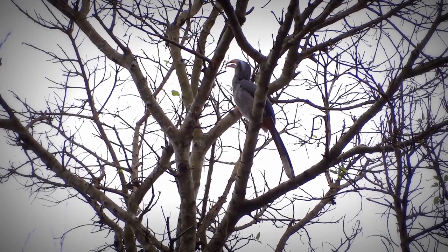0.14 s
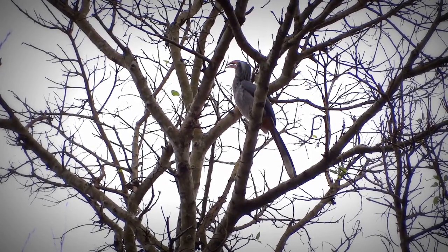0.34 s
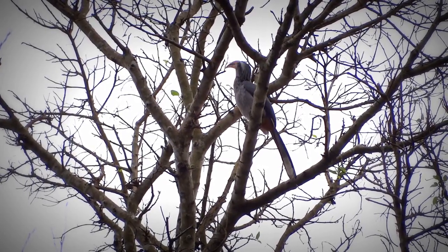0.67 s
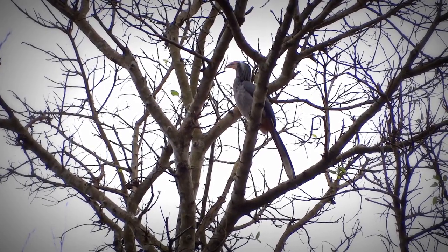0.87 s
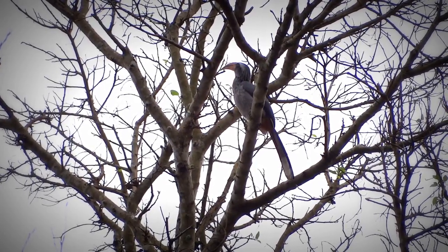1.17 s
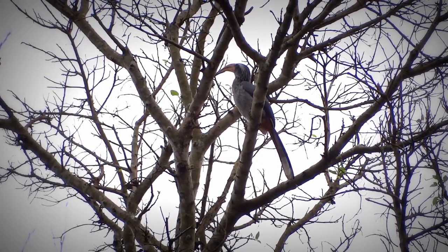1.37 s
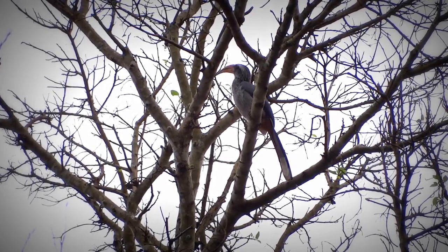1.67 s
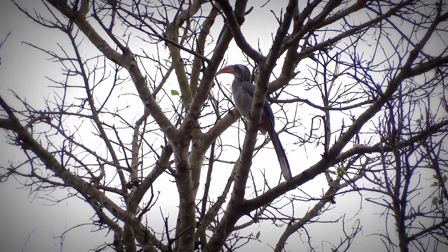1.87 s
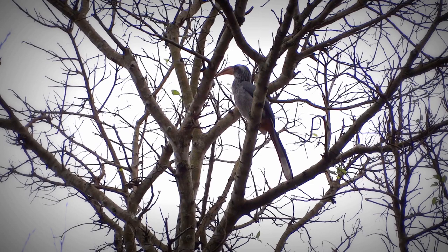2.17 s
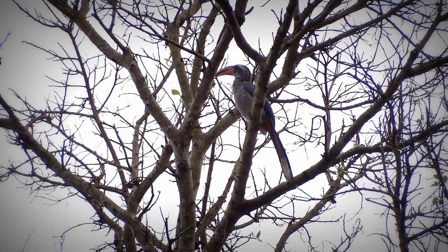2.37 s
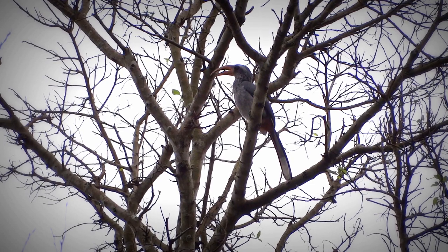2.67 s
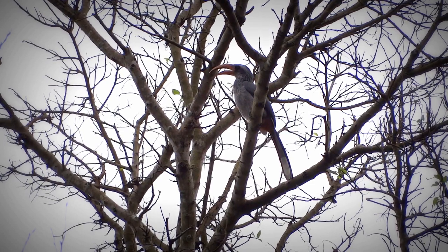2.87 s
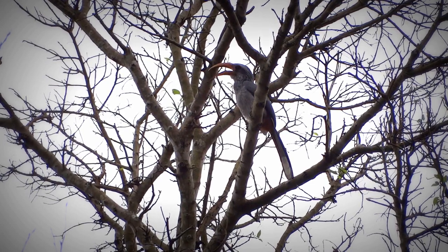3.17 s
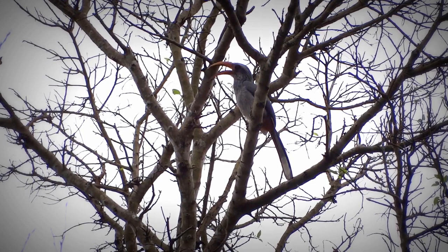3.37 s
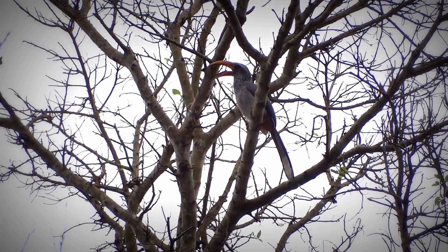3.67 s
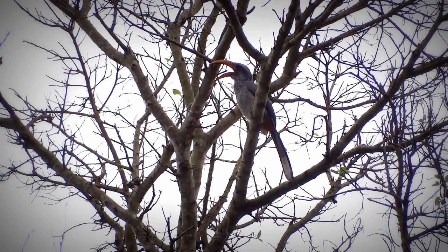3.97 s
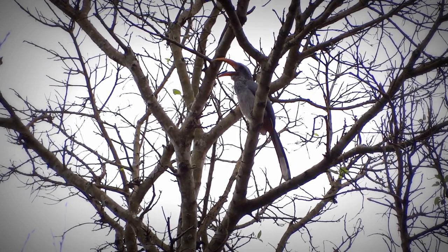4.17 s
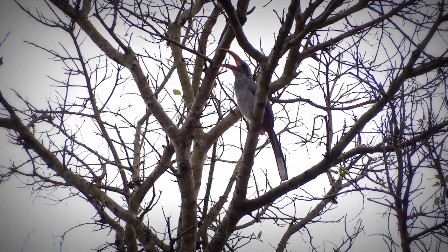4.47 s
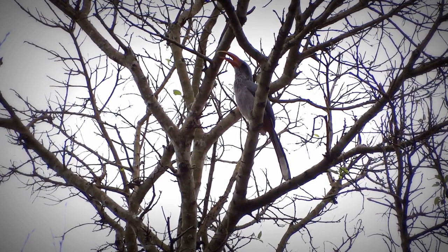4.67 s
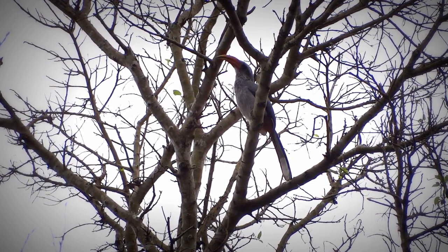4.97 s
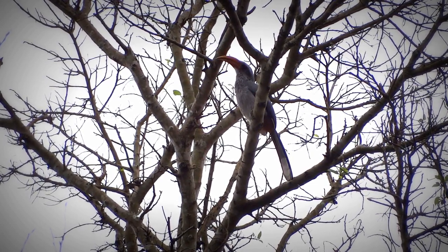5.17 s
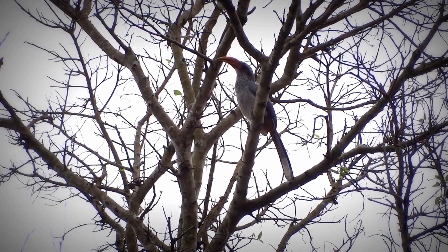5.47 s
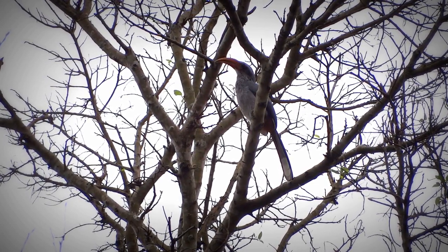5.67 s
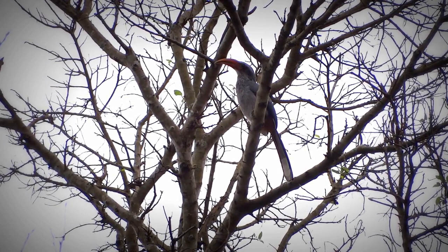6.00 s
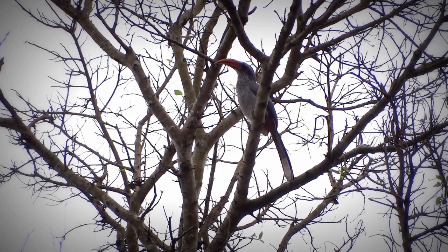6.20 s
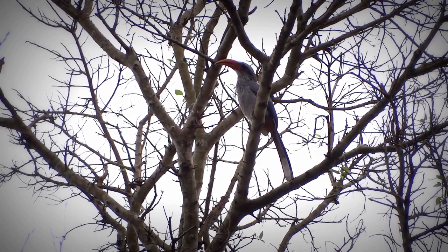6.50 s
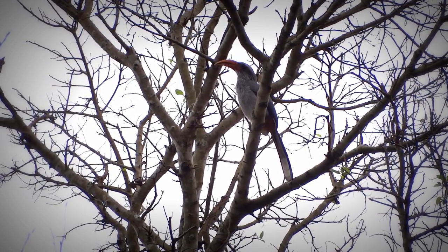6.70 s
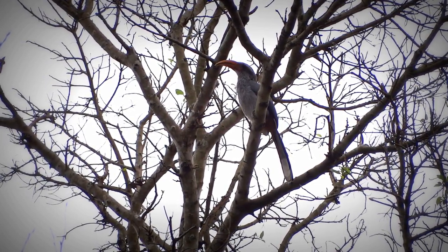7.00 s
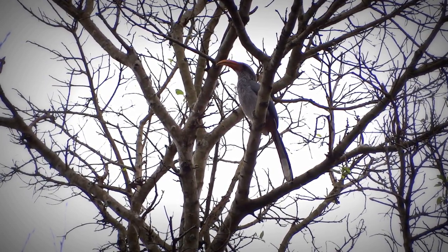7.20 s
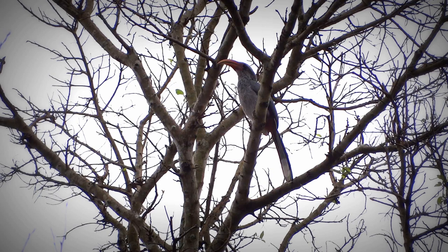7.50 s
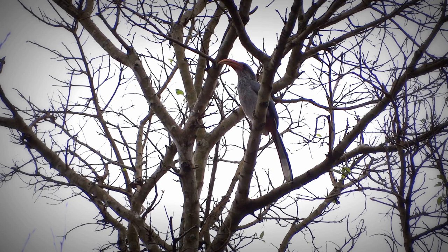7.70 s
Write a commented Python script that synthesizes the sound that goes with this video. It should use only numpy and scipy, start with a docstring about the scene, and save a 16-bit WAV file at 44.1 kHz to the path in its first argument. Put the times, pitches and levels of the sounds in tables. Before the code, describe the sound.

Outdoors in woodland, a large hornbill gives a hoarse, rising and falling squeal right at the start, with a sharp dry click, then a rounder squeal just after three seconds. Between and after, smaller birds warble, buzz and pip farther away, and faint low hoots roll behind. Insects shimmer high and steady over soft hiss and light wind rumble. Nearly mono camera microphone, with echo from the trees.

```python
"""Hornbill squeals in the woods

A hornbill squeals twice from a bare tree: reedy, arching harmonic tones, frayed into rasp, with woodland echo.
Smaller birds further off warble, buzz and pip as gliding sine tones; low hoots share one wavering pitch.
Short ringing bursts make a few dry clicks and grainy noise a scuff, over insects made of narrow noise bands.
Soft hiss and a light wind rumble, both shaped noise, lie under it all on a nearly mono camera microphone."""
import sys
import numpy as np
from scipy import signal
from scipy.fft import rfft, irfft
from scipy.io import wavfile

SR = 44100
rng = np.random.default_rng(int(sys.argv[2]) if len(sys.argv) > 2 else 0)


def unload_audio(sound):
    """Save the sound as a 16-bit wav file, at the path given as the first command line argument."""
    columns = np.transpose(np.atleast_2d(sound))
    # keep every value between -1 and 1, then stretch to whole-number steps
    steps = np.round(np.clip(columns, -1, 1) * 32767)
    wavfile.write(sys.argv[1], SR, steps.astype(np.int16))


N = 346185
T = np.arange(N) / SR  # time (s)
FREQ = np.fft.rfftfreq(N, 1 / SR)  # spectrum bins (Hz)


def undb(db):
    """Decibels to gain."""
    return 10 ** (np.asarray(db) / 20)


def unit(x):
    """Scale to rms 1."""
    return x / np.sqrt(np.mean(x ** 2) + 1e-20)


def colour(x, points):
    """Filter by a spectrum of (f/Hz, level/dB) points, joined on a log frequency axis."""
    hz, db = np.transpose(points)
    gain = undb(np.interp(np.log(FREQ + 1), np.log(hz), db))
    return irfft(rfft(x) * gain, N)


def noise():
    """White noise."""
    return rng.standard_normal(N)


def walk(rate):
    """Smooth random wavering of rms 1, from noise rolled off above about rate Hz."""
    return unit(irfft(rfft(noise()) * np.exp(-.5 * (FREQ / rate) ** 2), N))


def curve(rows, axis=1):
    """One column of a table, joined by straight lines in time."""
    rows = np.array(rows)
    return np.interp(T, rows[:, 0], rows[:, axis])


def gate(rows, fade=0.0033):
    """Open while a table lasts, with soft ends of fade seconds."""
    to_nearest_end = np.minimum(T - rows[0][0], rows[-1][0] - T)
    return np.clip(to_nearest_end / fade + .5, 0, 1)


def hump(s, length):
    """A smooth swell that peaks at s seconds and is down to 1/e half a length either side."""
    return np.exp(-(2 * (T - s) / length) ** 2)


def sine(hz):
    """A sine that follows a moving pitch."""
    return np.sin(2 * np.pi * np.cumsum(hz) / SR)


def pan(x, db):
    """Place a sound by its left minus right level."""
    return np.array([x * undb(db / 2), x * undb(-db / 2)])


def spread(mid, side):
    """Left and right from mid and side."""
    return np.array([mid + side, mid - side])


def add(out, s, x):
    """Mix a short sound in at s seconds."""
    i = int(s * SR)
    out[..., i:i + x.shape[-1]] += x[..., :N - i]


def woods(x, direct_db, wet_db, t60, near_db, near_t60=0.031, side=0.25):
    """Direct sound, quick scatter from near branches and a long tail from far trunks."""
    t = np.arange(int(1.5 * SR)) / SR
    trunks = unit(undb(-60 * t / t60))
    branches = undb(near_db) * unit(undb(-60 * t / near_t60))
    onset = 1 - np.exp(-t / 0.0055)
    mid, wide = rng.standard_normal((2, len(t))) * (trunks + branches) * onset
    echo = unit(spread(mid, side * wide)) / np.sqrt(len(t))
    wet = signal.fftconvolve(x, echo, axes=1)[:, :N]
    return undb(direct_db) * x + undb(wet_db) * wet


# throat colour of the overtones and rasp: (f/Hz, level/dB)
THROAT_COLOUR = [(550, -7), (800, -7.5), (1300, -1), (2600, -1), (3100, -0.5), (3900, -1.5), (4450, 0),
                 (5300, -5.5), (7000, -7.5), (10500, -8)]
BILL_WIDTH_HZ = 530
LOW_FULL_HZ, LOW_DB_PER_OCTAVE = 746, 51  # the two lowest harmonics fade below this pitch
OVERTONE_FLICKER_DB = 3
HOARSE_AFTER_S, HOARSE_DB = 0.12, 5  # overtones and rasp grow by this much as a squeal gets going
FLUTTER_HZ = 22.1  # throaty flutter of the two lowest harmonics


def squeal(rows, jitter, bill_hz, bill_db, bill_fade_s, rasp_db, low_db, upper_db, fray, tilt_db,
           first_db, flutter, count=15):
    """A reedy tone led by its third harmonic; uneven cycles fray the overtones into rasp."""
    hz = curve(rows) * (1 + jitter * walk(210))
    age = T - rows[0][0]
    phase = 2 * np.pi * np.cumsum(hz) / SR

    third = undb(curve(rows, axis=2))
    second = undb(low_db + LOW_DB_PER_OCTAVE * np.minimum(np.log2(hz / LOW_FULL_HZ), 0))
    second = second * (1 + flutter * np.cos(2 * np.pi * FLUTTER_HZ * age))
    core = third * np.sin(3 * phase) + second * (np.sin(2 * phase) + undb(first_db) * np.sin(phase))

    # harmonics 5 and 6 ring out clean as they glide through the bill's resonance, less so with age
    bill = sum(np.sin(k * phase) / (1 + ((k * hz - bill_hz) / BILL_WIDTH_HZ) ** 4) for k in (5, 6))
    bill = bill * undb(bill_db) / (1 + (age / bill_fade_s) ** 2)

    # a small slip in each cycle's timing (radians) blurs the high harmonics most
    slip = fray * walk(240)
    overtones = 0
    for k in range(4, count):
        flicker = undb(OVERTONE_FLICKER_DB * walk(29))
        overtones = overtones + undb(tilt_db * np.log2(k)) * np.sin(k * (phase + slip)) * flicker
    rasp = undb(rasp_db) * noise() * (1 + np.cos(phase))  # breath pulsed once per cycle
    upper = unit(colour(unit(overtones) + rasp, THROAT_COLOUR))

    hoarse = undb(upper_db - HOARSE_DB * np.clip(1 - age / HOARSE_AFTER_S, 0, 1))
    hoarse = hoarse * np.clip((rows[-1][0] - T) / 0.012, 0, 1)
    return gate(rows, fade=0.02) * (np.sqrt(2) * (core + bill) + hoarse * upper)


# the two squeals: (t/s, pitch f/Hz, third harmonic level/dB before the woods)
HOARSE_SQUEAL = [(0.105, 526.0, -50), (0.115, 538.6, -43), (0.137, 574.4, -57), (0.167, 631, -38.5),
                 (0.199, 668.5, -33.5), (0.221, 757.9, -36.5), (0.237, 771, -44), (0.281, 781, -39.5),
                 (0.361, 740.4, -43), (0.375, 731, -34.5), (0.452, 617, -41)]
ROUND_SQUEAL = [(3.195, 523, -45.5), (3.229, 577.3, -51.5), (3.269, 693, -38.5), (3.289, 735, -40),
                (3.325, 740, -29.5), (3.353, 742, -38), (3.387, 726.5, -33.5), (3.419, 696, -38.5),
                (3.46, 580, -52)]


def hornbill(fray=.095):
    """A hoarse squeal, then a rounder one whose overtones slope down and carry less rasp."""
    first = squeal(HOARSE_SQUEAL, jitter=0.0015, bill_hz=3900, bill_db=-46, bill_fade_s=0.14, rasp_db=-2,
                   low_db=-41.5, upper_db=-44.5, fray=fray, tilt_db=2.5, first_db=-17, flutter=0.62)
    second = squeal(ROUND_SQUEAL, jitter=0.0039, bill_hz=4370, bill_db=-52, bill_fade_s=0.22, rasp_db=-7,
                    low_db=-50, upper_db=-44, fray=fray, tilt_db=-7.5, first_db=-13.5, flutter=.15)
    return woods(pan(first + second, -1.2), direct_db=-3.0, wet_db=-7, t60=0.98, near_db=-5, side=0.22)


# a run of warbled notes: (t/s, length/s, centre f/Hz, swing/Hz, level/dB before swell and woods)
WARBLES = [(2.615, 0.15, 2750, 328, -53), (2.905, 0.17, 3230, 215, -50.5), (3.06, 0.13, 2555, 330, -51),
           (3.474, 0.12, 3155, 151, -50.5), (3.661, 0.19, 3170, 302, -52), (3.891, 0.15, 3087, 346, -51.5),
           (4.113, 0.19, 3010, 350, -52), (4.377, 0.17, 3020, 289, -51), (4.615, .165, 2875, 230, -49),
           (4.864, 0.21, 2960, 310, -53), (5.161, 0.15, 2785, 109, -51), (5.557, .2, 2863, 305, -55.5),
           (6.094, 0.16, 2897, 275, -57.5)]
WARBLE_HZ, WARBLE_SLOWING_HZ_PER_S = 26.91, 2.1  # swings per second; they slow down through the run
ARCH_HZ, SLUR_SHARE = 90.2, 0.41  # pitch arch of a note; share of it spent on the closing slur
SLUR_HZ, SLUR_GROWTH_HZ_PER_S = 30, 96.6  # the slur falls further as the run goes on


def warbler(throb=0.26, uneven=0.129, wobble_hz=40, slur_db=1.0):
    """Each arching note makes quick, uneven swings of pitch that shrink into a smooth falling slur."""
    out = np.zeros(N)
    pace = 1 + uneven * walk(19.0)
    wobble = wobble_hz * walk(73.5)
    for s, length, hz, swing_hz, db in WARBLES:
        u = np.linspace(0, 1, int(length * SR))
        into_run = s - WARBLES[0][0]
        now = int(s * SR) + np.arange(len(u))
        swing_rate = WARBLE_HZ - WARBLE_SLOWING_HZ_PER_S * into_run
        turn = 2 * np.pi * swing_rate * np.cumsum(pace[now]) / SR
        slur = np.clip((u - 1) / SLUR_SHARE + 1, 0, 1)
        swing = (1 - slur) ** 2 * (wobble[now] - swing_hz * np.cos(turn))
        fall = (SLUR_HZ + SLUR_GROWTH_HZ_PER_S * into_run) * slur
        pitch = hz + swing + ARCH_HZ * np.sin(np.pi * u) - fall
        # the upward swings and the slur are the loud parts
        edges = np.abs(np.sin(np.pi * u)) ** .25
        swell = edges * (1 + throb * (1 - slur) * np.sin(turn)) * undb(slur_db * (slur - 1.0))
        add(out, s, undb(db) * np.sqrt(2) * swell * sine(pitch))
    return woods(pan(out, 2.2), direct_db=-2, wet_db=1.2, t60=1.0, near_db=-1.5)


# All bird levels below are before each note's swell and the woods.
# a high buzzy phrase, lead-in, buzz and falling slur:
# (t/s after its start, length/s, start f/Hz, end f/Hz, buzz depth/Hz, level/dB within the phrase)
PHRASE_PARTS = [(0, 0.044, 5450, 5480, 490, 1.5), (0.03, 0.0782, 5980, 6080, 950, 0.5),
                (0.106, .04, 5100, 4100, 320, -2)]
# each time it is sung: (t/s, level/dB, left minus right/dB)
PHRASES = [(0.801, -47.5, -4), (5.112, -51, -6), (6.736, -49.5, -6)]
# harsh wide buzzes: (t/s, length/s, centre f/Hz, level/dB)
RASPS = [(5.36, .06, 3870, -54), (5.47, .13, 3790, -53), (5.579, 0.15, 3780, -56.5),
         (5.858, 0.11, 6330, -53), (7.028, 0.063, 4170, -47.5)]
RASP_DEPTH = 0.153  # buzz depth as a share of the centre
# quick rising whistles: (t/s, length/s, start f/Hz, end f/Hz, level/dB)
UPSWEEPS = [(3.27, 0.047, 4760, 5770, -46), (5.316, .042, 3150, 4620, -48.5),
            (5.423, 0.042, 3300, 4310, -47), (6.967, 0.057, 3115, 4890, -47),
            (7.01, 0.074, 2100, 2840, -61.5)]
UPSWEEP_BUZZ_HZ, UPSWEEP_PAN_DB = 70, 1.5
# low churring notes: (t/s, length/s, pitch f/Hz, level/dB, left minus right/dB)
CHURRS = [(2.073, 0.047, 1740, -55.5, -5), (2.16, 0.052, 1510, -59.5, -2), (2.41, 0.035, 2185, -53.5, 3),
          (2.778, 0.056, 2160, -49.5, 5.5), (2.862, 0.047, 2137, -50.5, -2), (3.111, 0.041, 2110, -45, 4),
          (7.163, 0.067, 2174, -55, 4), (7.433, 0.078, 2210, -50.5, 3.5)]
CHURR_DEPTH, CHURR_FALL = 0.079, 0.047  # buzz depth and fall as shares of the pitch
# clear pips: (t/s, level/dB, left minus right/dB)
PIPS = [(1.678, -54, -8), (1.946, -43, 4)]
PIP_S, PIP_FROM_HZ, PIP_TO_HZ = 0.039, 2823, 2625
WHISTLE_AT_S, WHISTLE_S, WHISTLE_HZ, WHISTLE_DB = 0.53, 0.34, 3883, -55  # one thin held whistle


def small_birds(buzz_hz=115):
    """Gliding whistles; a fast, uneven swing of pitch makes many of the far ones buzz."""
    near, far = np.zeros((2, 2, N))
    buzz = sine(buzz_hz * (1 + .3 * walk(60))) * (0.874 + 0.252 * walk(90))

    def note(out, s, length, start_hz, end_hz, depth_hz, db, pan_db, taper=0.41):
        """Mix in one glide that swells and fades."""
        u = np.linspace(0, 1, int(length * SR))
        pitch = start_hz + (end_hz - start_hz) * u + depth_hz * buzz[int(s * SR):][:len(u)]
        swell = np.abs(np.sin(np.pi * u)) ** taper
        add(out, s, pan(undb(db) * np.sqrt(2) * swell * sine(pitch), pan_db))

    for s, db, pan_db in PHRASES:
        for after, length, start_hz, end_hz, depth_hz, part_db in PHRASE_PARTS:
            note(far, s + after, length, start_hz, end_hz, depth_hz, db + part_db, pan_db)
    for s, length, hz, db in RASPS:
        note(far, s, length, hz, hz, RASP_DEPTH * hz, db, 0)
    for s, length, start_hz, end_hz, db in UPSWEEPS:
        note(far, s, length, start_hz, end_hz, UPSWEEP_BUZZ_HZ, db, UPSWEEP_PAN_DB)
    for s, length, hz, db, pan_db in CHURRS:
        note(far, s, length, hz, hz * (1 - CHURR_FALL), CHURR_DEPTH * hz, db, pan_db)
    note(far, WHISTLE_AT_S, WHISTLE_S, WHISTLE_HZ, WHISTLE_HZ, 0, WHISTLE_DB, 0)
    for s, db, pan_db in PIPS:
        note(near, s, PIP_S, PIP_FROM_HZ, PIP_TO_HZ, 0, db, pan_db, taper=1.05)
    near = woods(near, direct_db=-1, wet_db=-6, t60=0.96, near_db=0)
    far = woods(far, direct_db=-4.0, wet_db=0, t60=0.92, near_db=-0.5)
    return near + far


# a distant bird's rolling hoots: (t/s at the peak, peak level/dB before the woods)
HOOTS = [(3.39, -58), (3.61, -64), (3.75, -60.5), (4.01, -59.5), (4.45, -70), (4.64, -65.5), (4.83, -61),
         (5.2, -70), (5.47, -63.5), (5.79, -60.5), (6.08, -58), (6.19, -65), (6.68, -65)]
HOOT_HZ, HOOT_S = 754, 0.085


def hoots():
    """Short low notes on one wavering pitch, blurred by the echo of the woods."""
    tone = sine(HOOT_HZ * (1 + 0.035 * walk(25.74)))
    swells = sum(undb(db) * hump(s, HOOT_S) for s, db in HOOTS)
    return woods(pan(tone * swells, 0), direct_db=0.5, wet_db=-3.0, t60=1.0, near_db=-7)


# dry clicks: (t/s, level/dB before shaping and the woods, ring f/Hz, ring time/s)
CLICKS = [(.0990, -21, 2310, .00019), (.1170, -6.5, 2820, .00034), (.1194, -24, 2370, .0005),
          (.3576, -18, 1740, .00028), (.4861, -22.5, 1030, .00061), (2.2003, -34, 2200, .00026),
          (2.2328, -39, 7600, .00026), (2.434, -38, 2800, .0005), (2.4525, -37, 1870, .00073),
          (3.713, -36.5, 1350, .00064)]


def clicks(crack_db=-16):
    """Each snap is a quickly dying ring that carries a thin crack of noise."""
    out = np.zeros(N)
    t = np.arange(int(.03 * SR)) / SR
    for s, db, hz, ring_s in CLICKS:
        body = t / ring_s * np.exp(1 - t / ring_s) * np.exp(-(t / (3 * ring_s)) ** 2)
        crack = undb(crack_db) * rng.standard_normal(len(t))
        add(out, s, undb(db) * body * (-np.cos(2 * np.pi * hz * t) + crack))
    out = signal.sosfilt(signal.butter(2, 450, "high", fs=SR, output="sos"), out)
    return woods(pan(out, 1.0), direct_db=-2, wet_db=-17, t60=0.44, near_db=2)


# a short scuff: (t/s, level/dB)
SCUFF = [(0.97, -67), (0.98, -55), (1.012, -43.5), (1.04, -59.5)]
# its colour: (f/Hz, level/dB)
SCUFF_COLOUR = [(88, -31), (150, -4), (632, -3.5), (1150, -1.5), (1570, -4.5), (6840, -13), (9000, -17),
                (11700, -48), (19800, -120)]


def scuff():
    """A brief rub close to the microphone: noise made grainy by fast random level changes."""
    grains = unit(colour(noise() * undb(1.8 * walk(335)), SCUFF_COLOUR))
    return pan(grains * undb(curve(SCUFF)) * gate(SCUFF), 1)


# insect choruses: (centre f/Hz, width/Hz, mid level/dB before shimmer and swell)
INSECTS = [(6520, 440, -64.5), (6590, 860, -64), (5120, 230, -69.5), (4707, 140, -68.5), (4030, 640, -70),
           (3140, 220, -75), (10050, 940, -74.5)]
SHIMMER_DB, INSECT_SWELL_DB = 2.4, 1.1


def insects(side=0.18):
    """Overlapping stridulations merged into narrow noise bands that shimmer and swell slowly."""
    out = 0
    for hz, width_hz, db in INSECTS:
        band = np.exp(-2 * ((FREQ - hz) / width_hz) ** 2)
        mid, wide = (unit(irfft(rfft(noise()) * band, N)) for _ in range(2))
        level = undb(db + SHIMMER_DB * walk(35) + INSECT_SWELL_DB * walk(1))
        out = out + spread(mid, side * wide) * level
    return out


# colour of still air and far foliage: (f/Hz, level/dB)
AIR_COLOUR = [(60, -13.5), (150, 4), (300, 0), (550, -1.5), (800, -2.5), (1200, -5.5), (2300, -7.5),
              (4000, -6), (5600, -9), (8000, -9), (11000, -10)]
# stereo width of the air: (f/Hz, side minus mid/dB)
AIR_WIDTH = [(30, 4), (80, -5), (170, -6.5), (350, -1), (700, -0.5), (1400, -1), (3000, -8.5), (6000, -19),
             (10000, -120)]
AIR_DB = -58  # level of the mid, around which it wavers
# colour of the wind: (f/Hz, level/dB)
WIND_COLOUR = [(12, 2), (20, -12), (43, 0), (86, 3), (147, -4), (172, -19), (300, -19.5), (390, -22),
               (660, -120)]
# gusts on the microphone: (t/s at the peak, length/s, peak level/dB before the flutter)
GUSTS = [(0.814, 0.24, -58.5), (2.09, .1, -60), (5.37, 0.18, -59), (5.866, 0.61, -59), (6.414, 0.065, -55),
         (6.587, 0.3, -55), (7.19, 0.2, -50.5)]
BREEZE_DB = -65.5  # the light wind between gusts


def air():
    """Soft outdoor hiss, with a breeze and its gusts rumbling alike in both channels."""
    mid = unit(colour(noise(), AIR_COLOUR))
    side = colour(unit(colour(noise(), AIR_COLOUR)), AIR_WIDTH)
    hiss = spread(mid, side) * undb(AIR_DB + .5 * walk(6))
    gust_power = sum((undb(db) * hump(s, length)) ** 2 for s, length, db in GUSTS)
    wind = np.sqrt(undb(BREEZE_DB) ** 2 + gust_power)
    return hiss + unit(colour(noise(), WIND_COLOUR)) * wind * undb(0.48 * walk(7.2))


def scene():
    """Birds, clicks, insects and wind around the tree."""
    return hornbill() + warbler() + small_birds() + hoots() + clicks() + scuff() + insects() + air()


TOP_HZ = 11100


def record(dry):
    """The camera cuts the top steeply, with a sharp low-pass."""
    return signal.sosfilt(signal.ellip(12, .2, 70, TOP_HZ, fs=SR, output="sos"), dry)


dry = scene()
out = record(dry)
unload_audio(out)
```